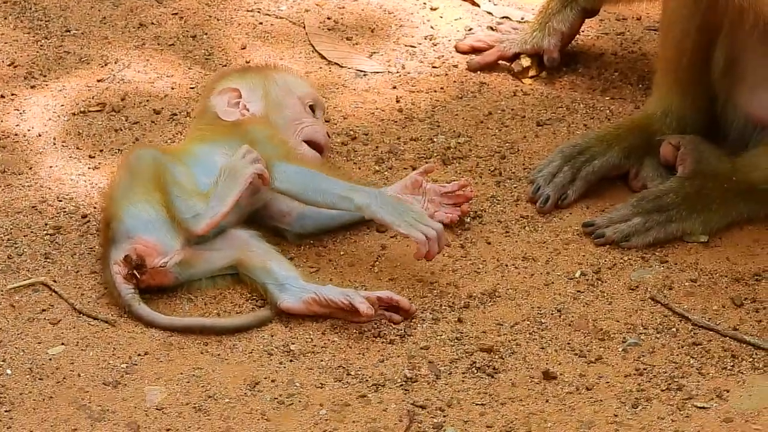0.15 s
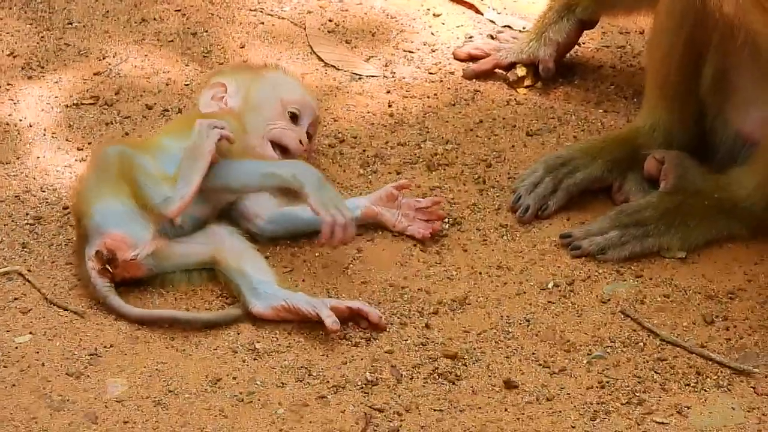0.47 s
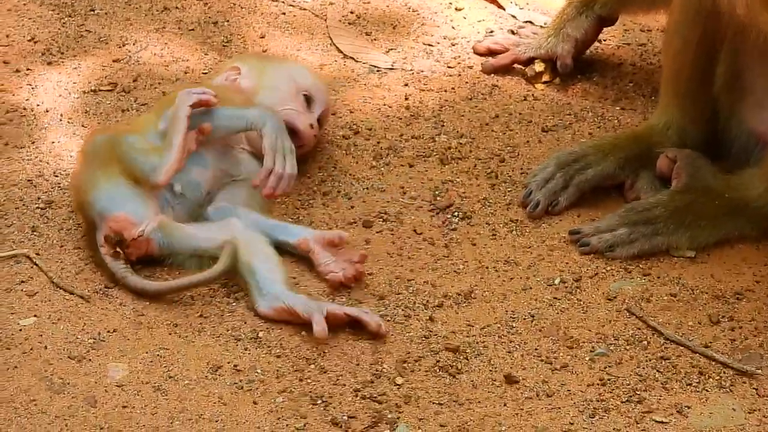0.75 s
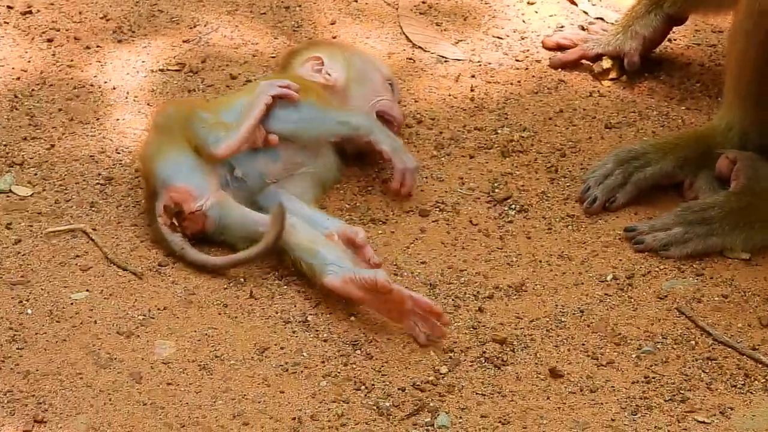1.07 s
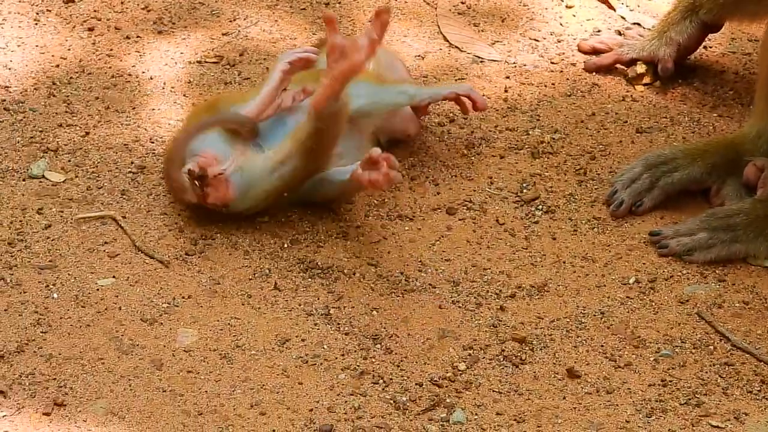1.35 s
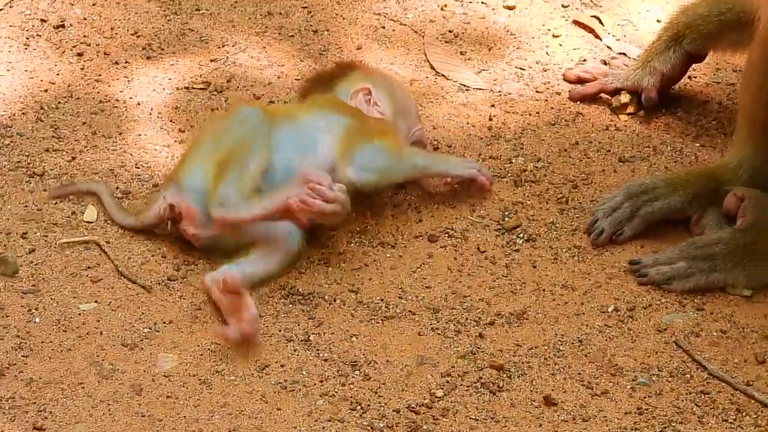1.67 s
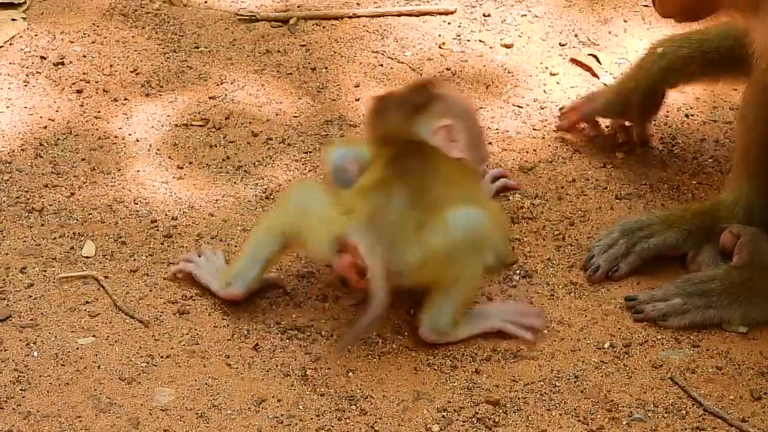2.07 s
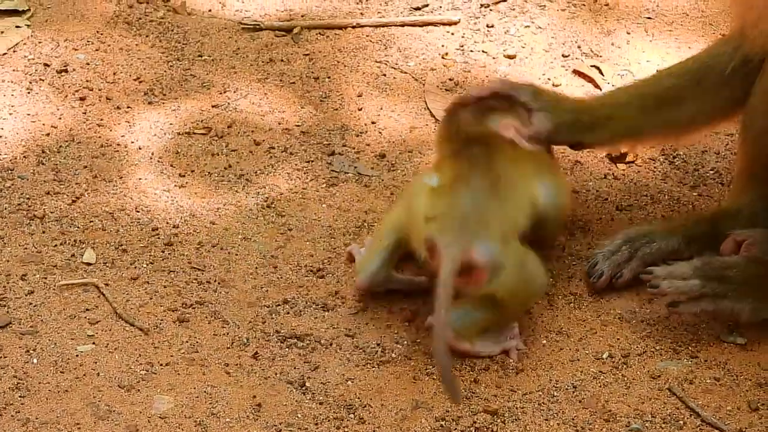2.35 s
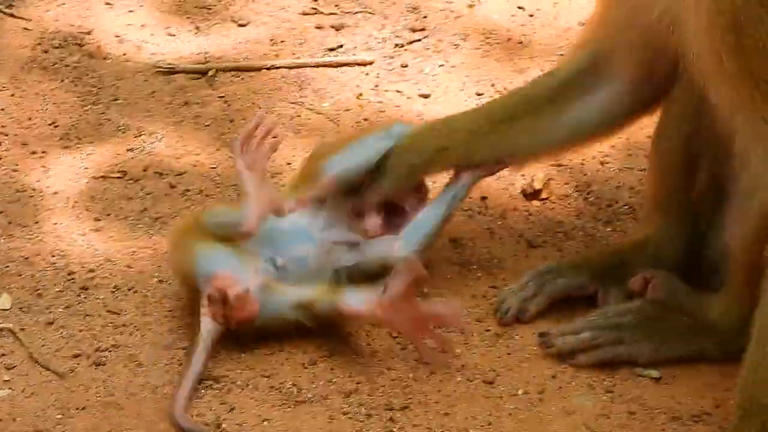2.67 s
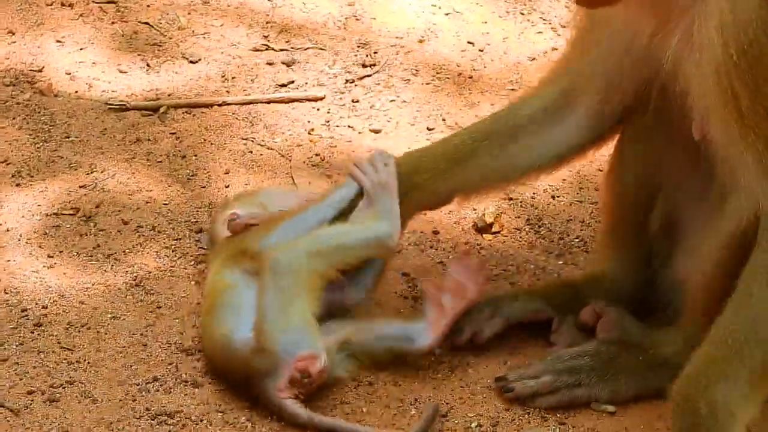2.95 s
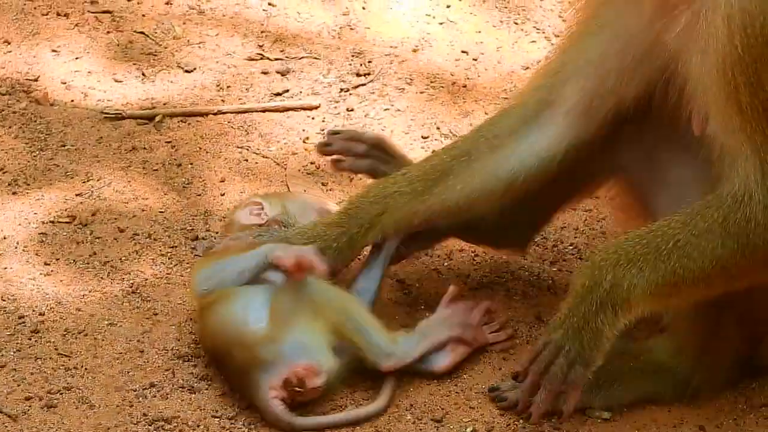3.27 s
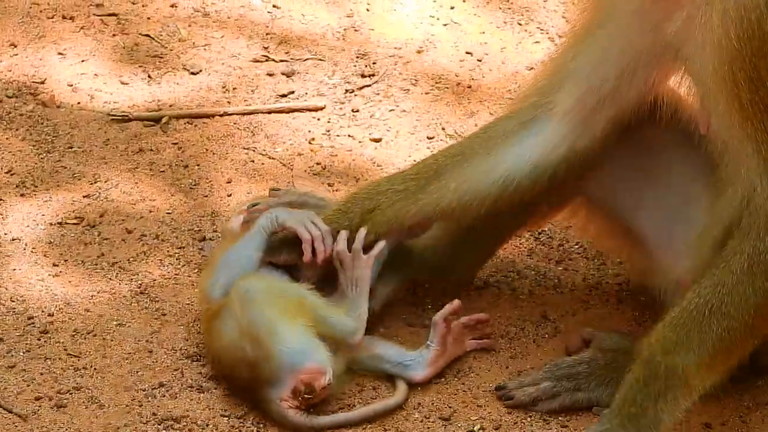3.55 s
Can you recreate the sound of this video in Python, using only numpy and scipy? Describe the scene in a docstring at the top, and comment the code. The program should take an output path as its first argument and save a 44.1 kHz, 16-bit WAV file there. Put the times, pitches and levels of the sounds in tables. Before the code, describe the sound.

Close outdoor capture of an infant monkey in distress, first barking hoarsely, then shrieking in rapid bursts that fray into a long quivering whistle, with faint scuffs, soft hiss and slight echo from trees.

```python
"""Infant monkey crying on sandy ground

Close by, outdoors: three hoarse barks, five shrill screams, thin wavering whistles between and after
the screams, a last hoarse cry. Two oscillators make the voice: a high squeal, nearly alone in the
whistles, and a slower irregular flutter of the folds that chops the squeal and rasps in the throat.
Shaped noise makes soft grunts and scuffs, scatter off the ground, a faint echo from the trees and a
hiss that sinks as the barks end.
"""
import sys
import numpy as np
from scipy import signal
from scipy.fft import rfft, irfft, next_fast_len
from scipy.io import wavfile
from scipy.ndimage import uniform_filter1d, minimum_filter1d, map_coordinates

SR = 44100
rng = np.random.default_rng(int(sys.argv[2]) if len(sys.argv) > 2 else 0)


def wav_out(sig):
    """Save sig, one row per channel (or a flat mono array), as 16-bit PCM at SR to the path in sys.argv[1]."""
    wavfile.write(sys.argv[1], SR, np.round(np.clip(np.atleast_2d(sig).T, -1, 1) * 32767).astype(np.int16))


N = 163170

# Pitch of the squeal in the rough cries. Each row: time in seconds, pitch in Hz.
SQUEAL_PITCH = [(.275, 2520), (.66, 2654), (.685, 3300), (.705, 2650), (.74, 3800), (.8, 3500), (.92, 3050),
                (.93, 3820), (.96, 4030), (1.0, 4185), (1.05, 4222), (1.08, 4600), (1.1, 4132),
                (1.218, 2700), (1.235, 3520), (1.26, 3960), (1.29, 4487), (1.31, 4790), (1.36, 4435),
                (1.545, 3794), (1.556, 3705), (1.562, 4200), (1.615, 4590), (1.69, 4490), (1.775, 5000),
                (2.21, 4615), (2.255, 4900), (2.28, 4820), (2.31, 4147), (2.437, 2790), (2.467, 3191),
                (2.487, 4240), (2.54, 4790), (2.565, 4530), (2.59, 4403), (2.61, 5062), (2.68, 4950),
                (3.435, 2196), (3.48, 2494), (3.52, 3337), (3.57, 3265)]


def barks():
    """Hoarse cries: a torn squeal, a low throat body and a crackly rasp that also rings an octave up."""
    # One list per cry. Each row: time in seconds, relative levels of squeal, low body, high rasp in dB.
    bark_levels = [
        [(.277, -22, -31.5, -41), (.285, -16.5, -28, -34), (.296, -14, -37, -23.5), (.308, -29, -24, -23),
         (.322, -35, -22.5, -37), (.352, -53, -42.5, -41)],
        [(.481, -13, -21, -52), (.487, -12.5, -37, -40), (.497, -18.5, -30, -19.5), (.52, -19.5, -22, -30.5),
         (.556, -33, -45, -36)],
        [(.666, -17, -19.5, -25), (.675, -18.5, -47, -30), (.684, -26, -32, -18.5), (.71, -14.5, -27.5, -29),
         (.73, -26, -56, -27.5), (.743, -30, -34.5, -18.5), (.765, -43, -40, -23), (.797, -30, -40, -38.5)],
        [(3.44, -26, -70, -69), (3.456, -28, -56, -40.5), (3.49, -22.5, -36.5, -33), (3.525, -19, -40, -24.5),
         (3.55, -25, -61, -27.5), (3.567, -42, -52, -45)],
    ]
    # Throat response. Each row: frequency in Hz, gain in dB.
    bark_throat = [(250, -9), (360, -8), (571, -6), (822, -3), (1140, 2), (2040, -4), (2620, -21),
                   (3890, -1.5), (7170, 0.5), (9190, -14.5), (13000, -34)]
    tone_db, body_db = -9.5, -1.5
    fold_phase, rough, source = folds(jitter=.35, air=.92)
    squeal_hz, = curves(SQUEAL_PITCH)
    source = ragged(source, 4)

    torn = squeal(fold_phase, rough, smear=1.2, chop=.8)
    tone = steady(torn + resonance(source, squeal_hz, width_hz=2300))
    crackle = amp(2.8 * wobble(300))
    octave = resonance(source, 2 * squeal_hz, width_hz=5000)
    rasp = steady(band(source, bark_throat, 3440, 15000) + .24 * octave)
    hum = undertone(fold_phase, rough, step_db=-8)
    body = steady(band(source, bark_throat, 300, 2670) + amp(2.5) * hum)

    tone_gain, body_gain, rasp_gain = np.sum([envelopes(rows) for rows in bark_levels], axis=0)
    mix = amp(tone_db) * tone_gain * tone + amp(body_db) * body_gain * body + rasp_gain * rasp
    return crackle * mix


def screams():
    """Shrill cries: stuttering squeal and fold pulses ring two throat resonances; buzz below, rasp above."""
    # One list per scream. Each row: time in seconds, then relative levels in dB of the squeal with
    # its resonance and of the upper resonance.
    scream_levels = [
        [(.925, -24.5, -52), (.93, -28, -37), (.935, -24, -41), (.94, -20.5, -25), (.966, -21, -25.5),
         (.975, -29.5, -28), (1.0, -25, -26), (1.02, -29.5, -25), (1.062, -26, -30.5), (1.094, -35.5, -51)],
        [(1.222, -27.5, -67), (1.236, -24.5, -33.5), (1.265, -21.5, -29.5), (1.277, -21.5, -28),
         (1.292, -16, -29.5), (1.31, -28, -24.5), (1.34, -32, -28), (1.378, -48, -35.5)],
        [(1.548, -24.5, -47), (1.558, -30, -41), (1.561, -19.5, -28), (1.585, -19.5, -23.5), (1.612, -25, -26),
         (1.645, -30.5, -22), (1.69, -37, -25), (1.707, -58, -29.5), (1.745, -27, -21.5), (1.778, -60, -34.5)],
        [(2.207, -39, -35), (2.23, -19.5, -30), (2.25, -26.5, -30), (2.285, -24, -36), (2.316, -39, -38.5)],
        [(2.436, -31.5, -57), (2.448, -29.5, -40), (2.478, -26, -30), (2.535, -25, -26.5), (2.545, -17.5, -21),
         (2.567, -17, -23.5), (2.58, -30, -24), (2.605, -26, -21), (2.642, -18.5, -30.5), (2.68, -62, -35.5)],
    ]
    # One row per scream: relative levels of low buzz, treble rasp and pure squeal in dB (the last
    # before pure_boost_db), upper resonance in Hz.
    timbres = [(-16.5, -1.5, -1, 6630), (-18.5, -7, -5, 5180), (-21.5, -9.5, 4.5, 5500), (-29, -5, 6, 5880),
               (-18, -4.5, -0.5, 5690)]
    # Throat response. Each row: frequency in Hz, gain in dB.
    scream_throat = [(300, -31.5), (750, -18.5), (1200, -23.5), (2400, -11), (7000, -1), (8500, -12.5),
                     (10500, -21), (15500, -28)]
    pure_boost_db = 8.5
    fold_phase, rough, source = folds(jitter=.15, air=1.0)
    squeal_hz, = curves(SQUEAL_PITCH)
    pure = rough * squeal(fold_phase, rough, smear=.8, chop=.4) * amp(4 * wobble(120))
    source = ragged(source, 3.5)

    bassless = filtered(source, lambda f: 1 - np.exp(-(f / 2400) ** 6))
    ring = resonance(bassless, squeal_hz, width_hz=1900)
    hum = undertone(fold_phase, rough, step_db=-31.5)
    buzz = steady(band(source, scream_throat, 569, 2580)) + hum
    rasp = steady(band(source, scream_throat, 8140, 11700))
    stutter = amp(3.2 * rough * wobble(330))

    out = np.zeros(N)
    for rows, (buzz_db, rasp_db, pure_db, upper_hz) in zip(scream_levels, timbres):
        lower, upper = envelopes(rows)
        out += lower * steady(ring + amp(pure_db + pure_boost_db) * pure)
        out += upper * (resonance(source, upper_hz, width_hz=2700) + amp(rasp_db) * rasp)
        out += amp(buzz_db) * np.sqrt(lower * upper) * buzz
    return out * stutter


def whistles(tremble=.0057, tear=.063, flicker_db=5, air_db=-18, split=.23, split_hz=850):
    """Thin gliding tone of the high oscillator; it frays and gains a line below as the folds join in."""
    # One list per whistle. Each row: time in seconds, mean pitch in Hz.
    pitches = [
        [(1.375, 6497), (1.386, 6480), (1.4, 5900), (1.412, 5400), (1.422, 5100), (1.434, 4040)],
        [(1.765, 6555), (1.785, 7080), (1.82, 6870), (1.837, 7130), (1.852, 6370), (1.872, 6540), (1.885, 5320),
         (1.915, 4800), (1.93, 4020), (1.955, 4340), (1.97, 3650), (2.005, 3612)],
        [(2.01, 4450), (2.04, 4910), (2.057, 4580), (2.083, 5120), (2.135, 4620), (2.158, 4210), (2.187, 4720),
         (2.215, 4610)],
        [(2.68, 4490), (2.69, 4984), (2.705, 5020), (2.725, 5620), (2.74, 5300), (2.753, 6130), (2.77, 6280),
         (2.783, 5480), (2.808, 5450), (2.83, 5620), (2.85, 6660), (2.89, 6530), (2.92, 5910), (2.95, 5960),
         (2.975, 5560), (3.0, 5745), (3.04, 5060), (3.1, 5060), (3.16, 4720)],
        [(3.17, 4687), (3.195, 4784), (3.213, 4965), (3.232, 4424), (3.244, 4680), (3.25, 5356), (3.26, 4850),
         (3.27, 4400)],
    ]
    # One list per whistle. Each row: time in seconds, relative level in dB.
    levels = [
        [(1.374, -36), (1.385, -27.5), (1.396, -41), (1.407, -22.5), (1.42, -27), (1.434, -34)],
        [(1.77, -31), (1.79, -35.5), (1.875, -34.5), (1.89, -40), (2.005, -46)],
        [(2.012, -41), (2.045, -36.5), (2.085, -39.5), (2.14, -30), (2.16, -45.5), (2.21, -29.5)],
        [(2.682, -27), (2.696, -21.5), (2.712, -30.5), (2.73, -22), (2.77, -25), (2.8, -37.5), (2.83, -29),
         (2.88, -29.5), (3.0, -30), (3.05, -36), (3.12, -31.5), (3.17, -38)],
        [(3.175, -38), (3.213, -30), (3.246, -30), (3.252, -14.5), (3.26, -21.5), (3.27, -33)],
    ]
    # Break-up of the tone. Each row: time in seconds, roughness from 0 to 1.
    breakup = [(1.82, 0.27), (1.86, 1), (1.9, 0.62), (2.04, 0.29), (2.70, 0.1), (2.73, 0.78), (2.765, 0.16),
               (2.84, 0.08), (2.885, 0.42), (2.92, 0.1), (3.01, 0.2), (3.05, 0.67), (3.16, 0.7),
               (3.21, 0.3), (3.26, 0.02)]
    # Each row: multiple of the pitch, mean level in dB.
    partials = [(1, 0), (1.5, -29), (2, -19)]
    # Colour of the rasp around the tone. Each row: frequency in Hz, gain in dB.
    air_colour = [(1200, -11.5), (2500, -9), (3500, -19), (6000, 8), (8500, -1.5), (11000, 6.5),
                  (15000, -4.5)]
    rough, = curves(breakup)
    drift = 1 + tremble * wobble(220) + tear * rough * wobble(900)
    fold_hz = split_hz * (1 + .15 * wobble(270))
    fold_phase = 2 * np.pi * np.cumsum(fold_hz) / SR
    flicker = amp(flicker_db * rough * wobble(500))
    noise = ragged(rng.standard_normal(N), 2.5)
    air = amp(air_db) * band(noise, air_colour, 830, 15000) * (.86 + 2.6 * rough)

    out = np.zeros(N)
    for pitch, level in zip(pitches, levels):
        phase = 2 * np.pi * np.cumsum(curves(pitch)[0] * drift) / SR
        tone = split * rough * np.sin(phase - fold_phase)
        for multiple, db in partials:
            swing_db = 4 * (multiple > 1.2) * wobble(160)  # the fundamental stays even
            tone = tone + amp(db + swing_db) * np.sin(multiple * phase)
        out += envelopes(level)[0] * (steady(tone * flicker) + air)
    swaying = out * amp(1.2 * wobble(50))
    return filtered(swaying, lambda f: 1 / np.sqrt(1 + (f / 10000) ** 6))


def squeal(fold_phase, rough, smear, chop):
    """High oscillator, shaken in phase and chopped in amplitude by the folds."""
    phase = 2 * np.pi * np.cumsum(curves(SQUEAL_PITCH)[0]) / SR
    shaken = np.cos(phase + smear * rough * wobble(600))
    return unit(shaken * (1 + chop * np.cos(fold_phase + wobble(500))))


def folds(jitter, air):
    """Uneven flutter of the folds: returns phase, roughness, and the pulses and puffs of air released."""
    # Each row: time in seconds, rate in Hz before jitter, roughness from 0 to about 1.
    flutter = [(.305, 600, 0.86), (.322, 578.2, 0.31), (.35, 469, 0.2), (.48, 540.5, .9), (.53, 580, 0.58),
               (.7, 592.6, 0.83), (.76, 904.4, 0.43), (.795, 623, 0.48), (.94, 644, 1.01),
               (1.01, 850, 0.46), (1.05, 700, 0.61), (1.27, 689.7, 0.97), (1.32, 819.6, 0.55),
               (1.58, 782.6, 1), (1.635, 945, 0.25), (1.66, 971, 0.25), (1.76, 852.5, 0.62),
               (2.24, 644.4, 0.6), (2.47, 639, 0.68), (2.51, 851, 0.25), (2.55, 752.3, 0.23),
               (2.58, 740.4, 0.7), (2.62, 721, 0.6), (2.67, 543, 0.5), (3.5, 849.3, 0.6), (3.56, 696, 1)]
    hz, rough = curves(flutter)
    cycles = np.cumsum(hz * np.exp(jitter * rough ** 2 * wobble(600))) / SR
    # each closure comes a little early or late, which blurs the high harmonics
    cycles = cycles + .028 * wobble(800)
    opening = (.5 + .5 * np.cos(2 * np.pi * cycles)) ** 2
    offset = (cycles - np.round(cycles)) * SR / hz  # samples from the nearest closure
    pulse_gain = amp(3 * rough * wobble(800))
    pulses = unit(np.sinc(offset) * np.exp(-(offset / 5) ** 2) * pulse_gain)
    puffs = air * np.sqrt(np.abs(rough)) * unit((.3 + opening) * rng.standard_normal(N))
    # the throat smears each pulse: delay grows with frequency
    spread = filtered(pulses, lambda f: np.exp(-1j * np.pi * f * f * 1.2e-7))
    return 2 * np.pi * cycles, rough, spread + puffs


def undertone(fold_phase, rough, step_db, count=3):
    """Lowest harmonics of the folds, which stand out where the flutter turns regular."""
    tone = sum(amp(k * step_db) * np.sin((k + 1) * fold_phase) for k in range(count))
    return unit(tone) * np.clip(1 - rough, 0, 1) ** 2


def resonance(x, hz, width_hz):
    """Throat resonance: x without its bass, through three equal poles whose centre may move."""
    highpass = signal.butter(3, 1500, "highpass", fs=SR, output="sos")
    x = signal.sosfilt(highpass, x)
    turn = np.exp(2j * np.pi * np.cumsum(hz * np.ones(N)) / SR)
    pole = np.exp(-np.pi * abs(width_hz) / SR)
    # shift the centre to 0 Hz, lowpass, shift back
    ringing = turn * signal.lfilter([1], np.poly([pole] * 3), x / turn)
    return steady(unit(np.real(ringing)))


def ragged(x, depth_db, size=5):
    """Chaotic texture: short bright and dull patches scattered over time and spectrum."""
    z = signal.stft(x, nperseg=256)[2]
    patch = np.outer(np.hanning(size + 2), np.hanning(2 * size))
    field = unit(signal.fftconvolve(rng.standard_normal(z.shape), patch, mode="same"))
    return signal.istft(z * amp(depth_db * field), nperseg=256)[1][:N]


def grunts_and_scuffs(attack_s=.0017, fall_db=14, q=2, grain_db=4):
    """Soft grunts, a thump and scuffs: short bursts of grainy band-passed noise."""
    # Each row: start in seconds, length in seconds, relative level in dB, centre in Hz.
    bursts = [(0.061, 0.013, -34, 683), (0.113, 0.024, -32.5, 1000), (0.117, 0.022, -41, 1730),
              (0.363, 0.024, -39.5, 2830), (.625, 0.16, -37.5, 2563), (1.396, 0.14, -52, 650),
              (1.571, 0.022, -43, 419), (2.391, 0.048, -44, 907), (2.888, 0.12, -50, 2400)]
    out = np.zeros(N)
    for start_s, length_s, db, hz in bursts:
        t = np.maximum(np.arange(N) / SR - start_s, 0)
        grains = rng.standard_normal(N) * amp(grain_db * wobble(500))
        burst = unit(filtered(grains, lambda f: 1 / (1 + 1j * q * (f / hz - hz / (f + 1))) ** 2))
        out += amp(db - fall_db * (t / length_s) ** 2) * np.minimum(t / attack_s, 1) * burst
    return out


def ground(x, t60_s=.022, size=2000):
    """Quick scatter off the sand and the mother's body, opposite in the two ears, widening the voice."""
    # Colour of the scatter. Each row: frequency in Hz, gain in dB.
    scatter_colour = [(300, -14.5), (2000, -8.5), (5000, -12), (8000, -6), (13000, -4)]
    burst = rng.standard_normal(size) * amp(-60 * np.arange(size) / SR / t60_s)
    scatter = signal.fftconvolve(x, burst / np.linalg.norm(burst))[:N]
    side = filtered(scatter, lambda f: amp(along(scatter_colour, f)))
    return np.array([side, -side])


def trees(x, side=.64, gain_db=2):
    """Faint diffuse echo: decaying noise tails that last longest in the treble."""
    # Each row: frequency in Hz, 60 dB decay time in seconds.
    decay = [(300, 0.23), (1500, 0.18), (4500, 0.63), (8000, 0.96)]
    # Each row: frequency in Hz, gain in dB before gain_db.
    echo_colour = [(300, -2), (2000, -14), (4700, -15.5), (8000, -27), (11000, -23)]
    hz, t, z = signal.stft(rng.standard_normal((2, SR)), SR, nperseg=256)
    tail = signal.istft(z * amp(-60 * t / along(decay, hz)[:, None]), SR, nperseg=256)[1]
    wet = signal.fftconvolve(x[None], tail / np.linalg.norm(tail[0]), axes=1)[:, :N]
    a, b = filtered(wet, lambda f: amp(along(echo_colour, f)))
    return np.array([a + side * b, a - side * b]) * amp(gain_db)


def hiss():
    """Soft, patchy outdoor noise, nearly mono in the bass."""
    # Each row: time in seconds, mean level in dB.
    hiss_level = [(0, -41), (.6, -40.5), (.72, -46.5), (.84, -53), (1.15, -56.5), (2.3, -54.5), (3.4, -54),
                  (3.7, -48)]
    # Each row: frequency in Hz, relative gain in dB.
    hiss_colour = [(45, -51), (126, -5.5), (284, 0.5), (420, -4), (691, -1.5), (1290, -4), (4310, -8.5),
                   (7650, -8.5), (14300, -29), (15500, -65)]
    # Each row: frequency in Hz, left-right likeness from 0 to 1.
    alike = [(100, 0.96), (1000, 0.76), (5000, 0.21), (12000, 0.047)]

    def mid_side(hz):
        turn = np.arccos(np.clip(along(alike, hz), -1, 1)) / 2
        return amp(along(hiss_colour, hz)) * [np.cos(turn), np.sin(turn)]

    noise = np.array([ragged(x, 2.2, size=7) for x in rng.standard_normal((2, N))])
    mid, side = filtered(noise, mid_side)
    return unit(np.array([mid + side, mid - side])) * amp(curves(hiss_level)[0] + wobble(35))


def amp(db):
    """Decibels to gain."""
    return 10 ** (np.asarray(db) / 20)


def unit(x):
    """Scale to rms 1."""
    return x / np.sqrt(np.mean(x ** 2) + 1e-20)


def steady(x, size=180):
    """Even out the slow swings of level; size in samples."""
    return x / np.sqrt(np.abs(uniform_filter1d(x * x, size)) + 1e-6)


def along(points, hz):
    """Interpolate (Hz, value) points on a log-frequency axis."""
    f, v = np.transpose(points)
    return np.interp(np.log(hz + 1), np.log(f + 1), v)


def curves(rows):
    """One value per sample for each column after the time."""
    s, *cols = np.transpose(rows)
    return [np.interp(np.arange(N) / SR, s, c) for c in cols]


def envelopes(rows, edge_s=.005):
    """Gains from dB columns, silent outside the call, with short ramps at its ends."""
    t = np.arange(N) / SR
    inside_s = np.minimum(t - rows[0][0], rows[-1][0] - t)
    gate = np.clip(inside_s / edge_s + .5, 0, 1)
    return [gate * amp(db) for db in curves(rows)]


def wobble(rate):
    """Smooth random curve, rate knots a second."""
    knots = rng.standard_normal(int(N * rate / SR) + 4)
    return map_coordinates(knots, [np.arange(N) * rate / SR])


def filtered(x, response):
    """Multiply the spectrum of x by response(Hz)."""
    m = next_fast_len(N + SR // 2)
    return irfft(rfft(x, m) * response(np.fft.rfftfreq(m, 1 / SR)), m)[..., :N]


def band(x, colour, lo_hz, hi_hz):
    """One steep-sided band of a coloured sound, at rms 1."""
    def response(f):
        sides = (1 + (lo_hz / (f + 1)) ** 16) * (1 + (f / hi_hz) ** 16)
        return amp(along(colour, f)) / np.sqrt(sides)
    return unit(filtered(x, response))


def scene():
    """The monkey, a touch early and soft on the left, with scatter, echo and background."""
    left_db, right_db, left_lead_s = -.8, .7, 1.7e-5
    monkey = barks() + screams() + whistles() + grunts_and_scuffs()
    ears = np.array([[1], [-1]])  # half the lead on each side
    direct = filtered(monkey, lambda f: np.exp(1j * np.pi * f * left_lead_s * ears))
    return direct * amp([[left_db], [right_db]]) + ground(monkey) + trees(monkey) + hiss()


def record(dry):
    """A fast limiter holds down the sharpest peaks, then everything from top_hz up is cut."""
    ceiling, top_hz = .6, 15750
    need = np.minimum(1, ceiling / (np.abs(dry).max(axis=0) + 1e-9))
    gain = uniform_filter1d(minimum_filter1d(need, size=61), size=61)
    return filtered(dry * gain, lambda hz: hz < top_hz)


dry = scene()
out = record(dry)
wav_out(out)
```